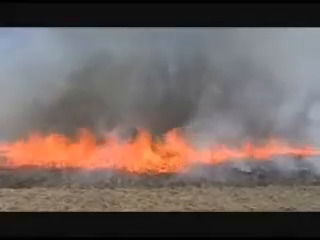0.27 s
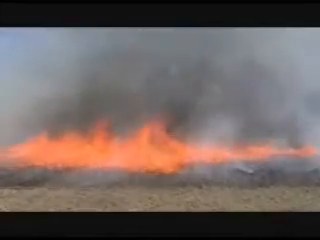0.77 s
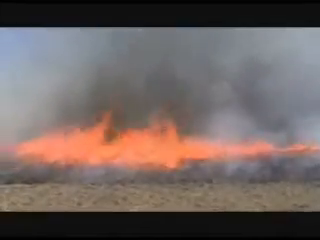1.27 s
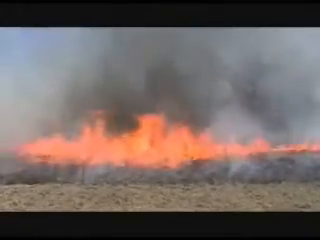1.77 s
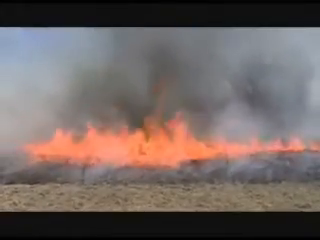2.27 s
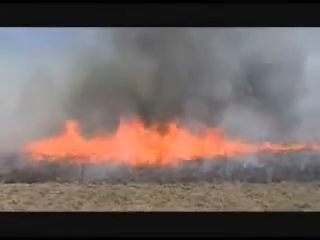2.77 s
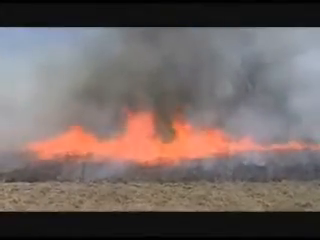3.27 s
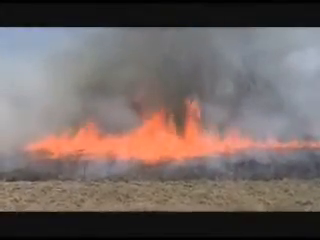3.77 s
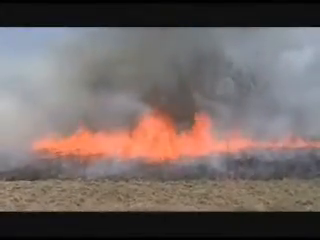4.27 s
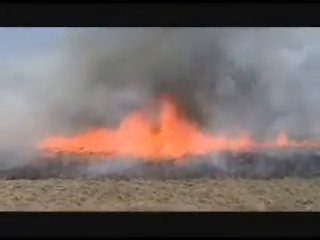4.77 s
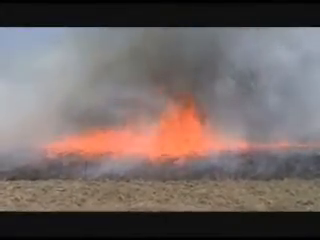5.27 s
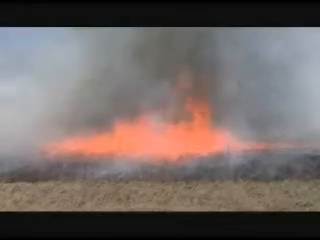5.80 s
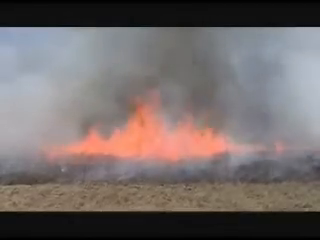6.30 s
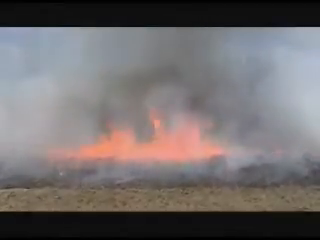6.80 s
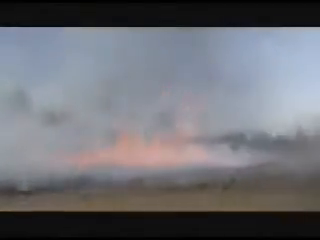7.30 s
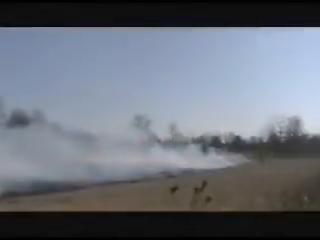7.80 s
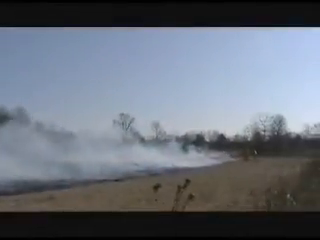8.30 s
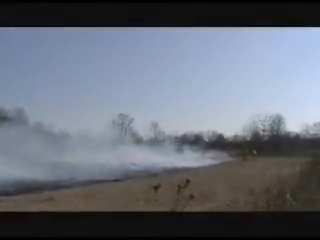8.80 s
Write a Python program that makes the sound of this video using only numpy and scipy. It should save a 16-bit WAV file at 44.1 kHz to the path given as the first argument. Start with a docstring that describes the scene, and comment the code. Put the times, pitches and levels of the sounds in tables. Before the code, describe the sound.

Loud, dry, bright crackling of a grass fire fills the first six seconds, made of countless tiny bursts and volleys of sharp stalk snaps above a soft low roar. The level dips, pops and briefly revives, then drops away by eight seconds. Quiet field rumble and weak smouldering hiss remain, with close twig clicks, short grass rustles and a faint far engine. Outdoors, no room echo, stereo, centre to left.

```python
"""A dense dry crackle on the left and centre: a front of flame runs through dry grass in an open field.
Random bursts splinter and ring in stalks, heard directly and off the ground; noise makes the flames' low roar.
Thick stalks snap in torn noise, and one sealed stem pops with an N-shaped pulse.
The crackle fades and leaves near snaps, bright ticks, grainy rustles, a breeze and a faint far engine hum."""
import sys
import numpy as np
from scipy import signal
from scipy.fft import rfft, irfft
from scipy.io import wavfile
from scipy.ndimage import uniform_filter1d

SR = 44100
rng = np.random.default_rng(int(sys.argv[2]) if len(sys.argv) > 2 else 0)


def generate_wav(sig):
    """Save sig (samples, or channels by samples) to the path in sys.argv[1] as 16-bit PCM at SR."""
    pcm = np.round(np.clip(np.atleast_2d(sig).T, -1, 1) * 32767).astype(np.int16)
    wavfile.write(sys.argv[1], SR, pcm)


N = 399101

# Levels are set at the source, ahead of the ground hollows, the stereo lean and the limiter.
# The crackle starts strong, eases, returns, eases again, revives briefly and fades.
# Each row: time in seconds, crackle level in dB before surges.
BURN = [(0, -14.5), (0.85, -19), (1.35, -16.5), (1.8, -15.5), (2.6, -15.5), (3.8, -15.5), (4.5, -16),
        (5.15, -17), (5.85, -21.5), (6.2, -20), (6.45, -18), (6.9, -18.5), (7.35, -25), (7.55, -28.5),
        (7.8, -31), (8.03, -39), (8.3, -52.5), (9.05, -65)]
# The finest sizzle over time. Each row: time in seconds, level in dB before surges.
SIZZLE = [(0, -37.5), (1.3, -41), (2.1, -35.5), (3.9, -43), (5.1, -44.5), (5.65, -50), (6.3, -45.5),
          (7.3, -53), (7.85, -54), (8.25, -72), (9.05, -77)]
# A tuft catches and the crackle surges. Each row: centre in seconds, rise in dB.
FLARES = [(0.04, 1.5), (0.335, 2.5), (0.57, 2), (0.65, 1), (0.96, 2.5), (1.56, 1.5), (1.77, 2.5),
          (2.125, 2.5), (2.5, 1), (2.9, 1), (3.1, 1.5), (3.31, 1), (3.75, 2), (4.58, 1.5), (6.67, 0),
          (6.78, 1.5), (6.95, 0.7), (7.39, 0.5)]
# The crackle dips briefly. Each row: centre in seconds, fall in dB, width in seconds.
DIPS = [(0.377, 1, .008), (0.452, 3.5, 0.019), (0.7, 2, 0.025), (0.81, 1, 0.021), (1.243, 3, .015),
        (1.62, 2, 0.012), (2.35, 1, 0.017), (2.45, 2, 0.011), (2.69, 1.5, .015), (2.757, 2, 0.012),
        (3.162, 4.5, 0.01), (4.19, 2.5, 0.0091), (4.283, 1.5, .014), (4.41, 2.5, 0.013), (5.76, 0.5, .016),
        (6.03, 2, 0.012), (6.265, 2, .018), (6.6, 1.5, 0.018), (7.12, 1.5, .016), (7.47, 2.5, .016),
        (7.6, 2, 0.014)]
# Shape of the crackle's spectrum. Each row: frequency in Hz, relative level in dB per Hz.
CRACKLE_SPECTRUM = [(40, -64), (320, -21.5), (550, -14.5), (800, -15), (1050, -10.5), (1280, -8),
                    (1570, -6), (1800, -5), (2100, -3), (2500, -1.1), (3500, 2), (4200, -0.5), (5200, -8),
                    (6300, -14), (7400, -23.5), (8200, -21.5), (10000, -26.5), (11000, -42)]
# Width of the crackle. Each row: frequency in Hz, side minus mid in dB.
CRACKLE_WIDTH = [(200, 0), (450, -4), (800, -6), (1300, -8.5), (2000, -10.3), (3000, -12.3), (4000, -8.5),
                 (5000, -6), (6000, -3), (7400, -2), (10000, -3.5)]
# Shape of the flames' roar. Each row: frequency in Hz, relative level in dB per Hz.
ROAR_SPECTRUM = [(25, -13), (45, -32), (70, -2.5), (110, 0.5), (160, 0.5), (230, -2.5), (310, -4),
                 (450, -6), (600, -4.5), (780, -9.5), (1100, -12), (1600, -3), (3000, -19.5), (6000, -73)]
# The low end swells or drops briefly. Each row: centre in seconds, change in dB, width in seconds.
BILLOWS = [(0.37, 3.5, .025), (0.45, -2, .02), (0.6, -11, .014), (0.82, -3, .04), (1.68, -2, .06),
           (2.13, 3, .04), (2.98, 2, .04), (3.3, 2.5, .04), (3.77, 4, .04), (4.2, -3, .03),
           (4.65, 2.5, .04), (5.35, 2, .05), (6.17, 3, .04), (6.47, 3.5, .09), (6.85, 2, .06),
           (7.5, -3, .13)]
# The thickest stalks snapping. Each row: start in seconds, peak in dB before the ground echo,
# pitch in Hz, tearing time in ms.
SNAPS = [(0.1965, -1, 2650, .7), (0.2147, -4, 3600, .7), (0.359, -2, 4120, 1), (0.4119, -3, 2700, .7),
         (0.4202, -2, 3300, .8), (0.556, -2, 3000, .7), (0.667, -5.5, 3200, 1.2), (0.746, -4, 3600, .9),
         (1.1958, -2, 3400, .7), (1.2148, -5, 2800, .8), (1.3348, -3, 3300, .8), (1.5845, -2, 3700, 1),
         (1.772, -1, 3700, .9), (1.8075, -3, 3200, .6), (1.9453, -3, 3200, .5), (2.0108, -4, 3200, .6),
         (2.168, 1.5, 3300, .7), (2.2977, -4, 2900, .7), (2.3673, -5, 4200, .7), (2.4165, -2, 3600, .7),
         (2.482, -3, 3800, 1.8), (2.5104, -1, 2550, .7), (2.6005, -1, 3850, 1), (2.6025, -2.5, 3400, .8),
         (2.6651, -5, 3000, .7), (2.721, -2.5, 3550, 1), (2.7312, -6, 3400, .6), (2.869, -4, 3670, .9),
         (2.9831, -3, 4100, .6), (3.078, -3, 3100, .6), (3.1218, -1, 2800, 1), (3.1422, 0, 2500, .8),
         (3.176, -3, 3500, .9), (3.1949, -5, 3000, .7), (3.238, -4, 2950, .8), (3.2503, -4, 3400, .5),
         (3.297, -2, 3650, 1.2), (3.321, -2, 3300, .8), (3.395, -1, 2700, 1), (3.4397, -1, 3500, .8),
         (3.5604, -3, 3700, .9), (3.845, -2, 2900, .8), (4.0066, -4, 3500, .6), (4.2214, -4, 2700, .7),
         (4.259, -1.5, 3650, 1.1), (4.3095, -5, 3300, .7), (4.7273, 0, 3450, .7), (4.927, -4, 3800, .4),
         (4.9922, -2, 3100, .4), (5.8677, -8, 2800, .6), (6.2404, 2, 3850, .7), (6.2429, -3.5, 3750, .8),
         (6.402, -5, 3100, .5), (6.6637, -5, 3000, .9), (7.3453, -12.5, 3400, .8), (7.3947, -13.5, 3100, 1),
         (7.506, -17, 3300, .7), (7.7694, -16, 3200, .9), (7.944, -23, 2800, .7), (8.0695, -22, 3200, .8)]
# Colour of a snap. Each row: frequency in Hz, filter gain in dB.
SNAP_COLOUR = [(200, -32), (1000, 3), (2200, 7), (3800, 11.5), (5500, 2.5), (7500, -13), (11000, -18)]
# A sealed stem bursts. One row: start in seconds, pulse peak in dB before its filters, length in seconds.
POP = (6.0133, -4, 0.00142)
# Bright clicks: the first sharpens the stalk snap at 6.24 s, the rest are dry twigs close by.
# Each row: start in seconds, peak in dB, pitch in Hz.
TICKS = [(6.2414, -8, 4200), (8.0693, -22, 2700), (8.0712, -17, 3600), (8.3248, -33, 8500),
         (8.3275, -35, 7000), (8.4462, -23, 3900), (8.4765, -37, 7500), (8.6222, -33, 2300),
         (8.6500, -39, 7500), (8.6623, -29, 7500), (8.7188, -31, 1900), (8.7605, -35, 5500),
         (8.7660, -36, 6000), (8.8182, -37, 3700), (8.8262, -32, 8500), (8.8490, -33, 4000),
         (8.8619, -31, 7000), (8.8662, -32, 4200), (8.8793, -20.5, 4000)]
# Colour of a tick. Each row: frequency in Hz, filter gain in dB.
TICK_COLOUR = [(300, -19), (1200, -3), (3500, 0.5), (5500, -9), (8000, -5.5), (11000, -14)]
# Short rustles of dry grass. Each row: start in seconds, level at the top of the swell in dB,
# pitch in Hz, swell time in ms.
RUSTLES = [(8.070, -38, 3000, 3.5), (8.242, -40, 2000, 3), (8.323, -43, 6000, 3), (8.468, -46, 5000, 7),
           (8.620, -41.5, 2400, 3), (8.630, -45, 3000, 2.5), (8.758, -45.5, 5500, 4),
           (8.864, -44, 4300, 1.8), (8.922, -42, 3100, 2.5), (9.016, -41, 3200, 3.5)]
# Colour of a rustle. Each row: frequency in Hz, filter gain in dB.
RUSTLE_COLOUR = [(500, -11), (2500, 3), (4500, -2), (8000, -9), (11000, -20)]
# A gust buffets the microphone. Each row: centre in seconds, level at its height in dB.
GUSTS = [(0.42, -51), (2.07, -45), (2.61, -44), (3.34, -48), (4.03, -48), (4.32, -55), (4.73, -55),
         (6.02, -51), (6.35, -53), (6.62, -55.5), (7.54, -59)]
# Shape of wind on the microphone. Each row: frequency in Hz, relative level in dB per Hz.
WIND_SPECTRUM = [(12, -8), (25, -11), (42, 0), (60, -2), (110, -25), (300, -60)]
# Shape of the field's rumble. Each row: frequency in Hz, relative level in dB per Hz.
FIELD_SPECTRUM = [(25, -42), (45, -22), (70, 4.5), (130, 1.5), (310, -1.5), (450, 0.5), (870, -4.5),
                  (1210, -7), (2950, -14), (5000, -43)]
# Shape of the hiss of smouldering stubble. Each row: frequency in Hz, relative level in dB per Hz.
SMOULDER_SPECTRUM = [(500, -10), (1500, -7), (3200, 2), (5000, -4.5), (7500, -7.5), (11000, -26)]
# Tones of the far engine. Each row: centre frequency in Hz, middle level in dB.
ENGINE_TONES = [(63, -60.5), (125.8, -59.5), (150, -57), (252, -63)]
# Overtones of a thin whine. Each row: multiple of the fundamental, level in dB.
WHINE_OVERTONES = [(5, -70), (12, -67), (14, -68), (20, -67), (22, -68)]
# Narrow bands that the ground cancels. Each row: centre in Hz before it wanders, width in Hz,
# share taken out at full depth.
HOLLOWS = [(308.4, 82, 0.91), (818, 42, 0.34), (1290, 90, .4)]
# The hollows come and go, and fill as the front moves on. Each row: time in seconds, depth from 0 to 1.
HOLLOW_DEPTH = [(0, 1), (0.42, .97), (0.65, .55), (0.9, 1), (1.27, 0.97), (1.5, 0.6), (2.15, .55),
                (2.5, .95), (2.85, 0.6), (3.3, 0.9), (3.8, 0.16), (4.12, .75), (4.5, 0.24), (7, 0.33),
                (8, 0)]
# The sound's lean across the microphone. Each row: frequency in Hz, left minus right in dB.
LEAN = [(100, 5.5), (450, 5.5), (780, 7), (1400, 4), (3500, 1.5), (6000, 0.7), (7400, -2.5), (8700, 3)]
# The sound narrows briefly. Each row: centre in seconds, pull (1 or more is fully central), width in seconds.
NARROWINGS = [(0.07, 1.1, 0.043), (0.96, 1.27, 0.037), (1.335, 1.28, 0.052), (1.8, 1.12, 0.056),
              (2.11, 0.95, 0.047), (2.53, 1.15, 0.059), (3.09, .8, .028), (3.31, 1.24, 0.033),
              (3.775, 1.3, 0.028), (3.99, .9, 0.042), (4.58, 1.03, 0.045), (6.03, 0.78, .016),
              (6.37, 1.25, 0.077), (7.82, .55, 0.086)]

# the crackle: nominal rate over all patches; its body of big stalks relative to the rest
BURSTS_PER_S, BODY_DB, FLARE_WIDTH_S = 9000, -12.5, 0.034
# multiplies the crackle's surges in dB: the sizzle swings harder
SIZZLE_FOLLOWS = 1.66
# roar level at full burn, and the share of the crackle's swing that it follows
FULL_BURN_DB, ROAR_DB, ROAR_FOLLOWS = -16.5, -35, 0.43
# left-right likeness of the roar, first and last
ROAR_ALIKE_FIRST, ROAR_ALIKE_LAST = 0.77, 0.55
BILLOW_TOP_HZ = 800
# lesser chance snaps: rate at full burn, peak above the crackle, range of pitch, tearing time
SNAPS_PER_S, SNAP_OVER_DB, SNAP_LOW_HZ, SNAP_HIGH_HZ, SNAP_TEAR_MS = 24, 3.5, 2030, 4430, 0.47
# lesser chance ticks in the stubble: rate, middle peak
TICKS_PER_S, TICK_DB = 26, -44.5
# path off the ground: nominal delay, echo gain, echo low-pass, spread of delay among patches (share)
GROUND_DELAY_S, GROUND_REFLECTION, GROUND_CUT_HZ, GROUND_SPREAD = 0.00178, 0.3, 1750, 0.051
# hot air bends that path: share by which its delay and the hollows wander
GROUND_WANDER, HOLLOW_WANDER = 0.052, 0.035
GUST_WIDTH_S, BREEZE_DB, FIELD_DB, SMOULDER_DB = .05, -69, -45.5, -51.5
WHINE_HZ = 149.8
CUTOFF_HZ = 11300


def crackle(burn_db, sizzle_db, left_lead_s=.000008, flare_db=1.0, haze_db=-15):
    """Patches along the front flare together, while each wanders quickly from side to side."""
    mid, side = np.zeros(N), np.zeros(N)
    flare = from_db(flare_db * drift(35))
    shimmer = GROUND_WANDER * drift(3.7)
    for k, stalk_hz in enumerate(np.geomspace(1400, 6500, num=12)):
        bursts = patch(stalk_hz, flare)
        mid += off_ground(bursts, GROUND_SPREAD * np.sin(2 * k) + shimmer)
        side += bursts * np.tanh(2 * drift(115))
    # the farthest bursts blur into hiss
    far = from_db(haze_db) * rng.standard_normal((2, N))
    mid = rms_one(mid) + far[0]
    side = colour(rms_one(side) + far[1], CRACKLE_WIDTH)[0]
    left, right = mid + side, delay(mid - side, left_lead_s)
    sound = colour(np.array([left, right]), CRACKLE_SPECTRUM)
    # big stalks give the body, fine blades the sizzle
    body, above = split(sound, 1472)
    crack, sizzle = split(above, 7110)
    main = from_db(BODY_DB) * rms_one(body) + rms_one(crack)
    return from_db(burn_db) * main + from_db(sizzle_db) * rms_one(sizzle)


def patch(stalk_hz, flare, size_db=2.5, flicker_db=1.5, ring=1.87, stalk_width_hz=1100,
          splinter=0.86, splinter_s=0.0025):
    """Clumps of bursts, mostly tiny, that splinter and ring briefly in stalks of one size."""
    chance = BURSTS_PER_S / 12 / SR * flare * from_db(2 * flicker_db * drift(25))
    born = np.flatnonzero(rng.random(N) < chance)
    sizes = from_db(size_db * np.minimum(rng.exponential(1, len(born)), 5.0))
    clicks = np.zeros(N)
    clicks[born] = sizes * rng.choice([-1, 1], len(born))
    # torn fibres go on giving way just after each burst
    keep = np.exp(-1 / (splinter_s * SR))
    tearing = np.sqrt(signal.lfilter([1 - keep], [1, -keep], clicks ** 2 + 1e-18))
    force = clicks + splinter * tearing * rng.standard_normal(N)
    return force + ring * resonate(force, stalk_hz, stalk_width_hz)


def surge(unrest_db=0.64):
    """Quick changes of crackle level in dB: surges, brief dips and a restless flicker."""
    flares = swells([(s, rise_db, FLARE_WIDTH_S) for s, rise_db in FLARES])
    return flares - swells(DIPS) + unrest_db * drift(13)


def roar(burn_db, billow_db=2.0):
    """Flame noise that billows and roars with the burn, and slowly spreads wider."""
    level_db = ROAR_DB + ROAR_FOLLOWS * (burn_db - FULL_BURN_DB) + billow_db * drift(11.6)
    return from_db(level_db) * air(ROAR_SPECTRUM, np.linspace(ROAR_ALIKE_FIRST, ROAR_ALIKE_LAST, N))


def snaps(burn_db, ring=9.3, width_hz=1300, give_s=.0005):
    """Thick stalks give way in quick volleys of tearing fibres; the harder the burn, the more of them."""
    out, t = np.zeros(N), np.arange(SR // 50) / SR
    chance = SNAPS_PER_S / SR * from_db((burn_db - FULL_BURN_DB) / 2)
    born = np.flatnonzero(rng.random(N) < chance)
    lesser = [(i / SR, burn_db[i] + SNAP_OVER_DB, rng.uniform(SNAP_LOW_HZ, SNAP_HIGH_HZ), SNAP_TEAR_MS)
              for i in born]
    for s, peak_db, hz, tear_ms in list(SNAPS) + lesser:
        force = rng.standard_normal(len(t)) * t * np.exp(-1000 * t / tear_ms)
        snap = colour(force + ring * resonate(force, hz, width_hz), SNAP_COLOUR)[0, :len(t)]
        add(out, s + give_s, from_db(peak_db) * snap / np.abs(snap).max())
    return off_ground(out)


def pop(low_hz=260, top_hz=3400, split_db=0, split_hz=2200, split_width_hz=1100):
    """Escaping steam sends out one N-shaped pressure pulse, and the stem splits with a click."""
    s, peak_db, length_s = POP
    phase = (np.arange(N) / SR - s) / length_s
    pulse = (1 - 2 * phase) * ((phase >= 0) & (phase < 1))
    pulse = cut(cut(pulse, low_hz, "high", order=1), top_hz, "low")
    impulse = 1. * (np.arange(N) == int((s + length_s) * SR))
    click = cut(resonate(impulse, split_hz, split_width_hz), top_hz, "low")
    return from_db(peak_db) * pulse + from_db(split_db) * click / np.abs(click).max()


def ticks(ring=2.2, width_hz=2200, splinter=0.072, splinter_s=0.0026):
    """Bright clicks, nearly all of dry twigs or stubble, each a ringing impulse with a faint splintering."""
    out, t = np.zeros(N), np.arange(SR // 50) / SR
    born = np.flatnonzero(rng.random(N) < TICKS_PER_S / SR)
    lesser = [(i / SR, TICK_DB + rng.normal(0, 2.5), rng.uniform(2000, 7000)) for i in born]
    for s, peak_db, hz in list(TICKS) + lesser:
        force = (t == 0) + splinter * rng.standard_normal(len(t)) * np.exp(-t / splinter_s)
        tick = colour(force + ring * resonate(force, hz, width_hz), TICK_COLOUR)[0, :len(t)]
        add(out, s, from_db(peak_db) * tick / np.abs(tick).max())
    return out


def rustles(ring=2.3, width_hz=2400, grain_db=3):
    """Dry blades brush together in short grainy puffs, each with a pitch of its own."""
    out, t = np.zeros(N), np.arange(SR // 10) / SR
    brushing = rng.standard_normal(N) * from_db(grain_db * drift(400))
    for s, level_db, hz, swell_ms in RUSTLES:
        force = np.roll(brushing, -int(s * SR))[:len(t)]
        age = 1000 * t / swell_ms
        puff = rms_one(colour(force + ring * resonate(force, hz, width_hz), RUSTLE_COLOUR)[0, :len(t)])
        add(out, s, from_db(level_db) * age * np.exp(1 - age) * puff)
    return out


def outdoors():
    """Wind, the wide rumble of the field, central smouldering hiss, the far engine and a thin whine."""
    field = from_db(FIELD_DB) * air(FIELD_SPECTRUM, alike=0.2)
    smoulder = from_db(SMOULDER_DB) * air(SMOULDER_SPECTRUM, alike=1.0)
    return wind() + field + smoulder + engine() + whine()


def wind():
    """Low noise of a light breeze on the microphone, with short gusts."""
    gusts = swells([(s, from_db(level_db), GUST_WIDTH_S) for s, level_db in GUSTS])
    return (from_db(BREEZE_DB) + gusts) * air(WIND_SPECTRUM, alike=.6)


def engine(waver_hz=0.55, swell_db=3):
    """Low engine tones, wavering in pitch and level on their way across the field."""
    out = np.zeros(N)
    for hz, db in ENGINE_TONES:
        level = from_db(db + swell_db * drift(3.3))
        phase = 2 * np.pi * np.cumsum(hz + waver_hz * drift(2.8)) / SR
        out += level * np.sqrt(2) * np.sin(phase)
    return out


def whine():
    """A few faint steady sine overtones of one pitch."""
    phase = 2 * np.pi * WHINE_HZ * np.arange(N) / SR
    return sum(from_db(db) * np.sqrt(2) * np.sin(multiple * phase) for multiple, db in WHINE_OVERTONES)


def off_ground(x, stretch=0):
    """The ground returns a dull echo, sooner or later as its path stretches."""
    echo = delay(x, GROUND_DELAY_S * (1 + stretch))
    return x + GROUND_REFLECTION * cut(echo, GROUND_CUT_HZ, "low")


def hollow(x):
    """Take out the wavering bands that the ground cancels."""
    depth, = in_time(HOLLOW_DEPTH)
    bend = 1 + HOLLOW_WANDER * drift(5.5)
    for hz, width_hz, share in HOLLOWS:
        # turn the band down to 0 Hz, low-pass it and turn it back
        turn = np.exp(2j * np.pi * np.cumsum(hz * bend) / SR)
        band, _ = split(x / turn, width_hz / 2)
        x = x - np.clip(share * depth, 0, 1) * 2 * np.real(turn * band)
    return x


def billowing(x):
    """The low end swells and sinks under the crackle."""
    low, high = split(x, BILLOW_TOP_HZ)
    return high + low * from_db(swells(BILLOWS))


def narrowing(x):
    """The sound draws in towards the centre for a moment and spreads out again."""
    mid, side = (x[0] + x[1]) / 2, (x[0] - x[1]) / 2
    closed = np.clip(swells(NARROWINGS), 0, 1)
    return mid + side * (1 - closed) * [[1], [-1]]


def air(spectrum, alike):
    """Stereo noise of unit power whose channels are partly alike."""
    mid, side = rng.standard_normal((2, N))
    alike = np.clip(alike, 0, 1)
    stereo = np.sqrt(1 + alike) * mid + np.sqrt(1 - alike) * side * [[1], [-1]]
    return rms_one(colour(stereo, spectrum))


def swells(rows):
    """Sum of bell-shaped swells, each with its centre (s), height and width (s)."""
    t = np.arange(N) / SR
    return sum(height * np.exp(-.5 * ((t - s) / width_s) ** 2) for s, height, width_s in rows)


def drift(rate_hz):
    """Slow random wander of spread 1, from noise through two equal low-passes."""
    # drawn at every 40th sample, after a run-in of 2000 draws
    r = np.exp(-80 * np.pi * rate_hz / SR)
    slow = signal.lfilter([1], [1, -2 * r, r * r], rng.standard_normal(N // 40 + 2002))[2000:]
    return np.interp(np.arange(N) / 40, np.arange(len(slow)), rms_one(slow))


def in_time(rows):
    """Each column of a curve at every sample."""
    s, *columns = np.transpose(rows)
    return [np.interp(np.arange(N) / SR, s, c) for c in columns]


def from_db(db):
    """Decibels to gain."""
    return 10 ** (np.asarray(db) / 20)


def rms_one(x):
    """Scale to unit power."""
    return x / np.sqrt(np.mean(x ** 2) + 1e-20)


def cut(x, hz, kind, order=2):
    """Butterworth filter."""
    return signal.sosfilt(signal.butter(order, hz, kind, fs=SR, output="sos"), x + 1e-18)


def split(x, hz):
    """Lows and highs that add up to the whole."""
    sos = signal.butter(4, hz, "low", fs=SR, output="sos")
    low = signal.sosfiltfilt(sos, x, padtype="even", padlen=SR // 10)
    return low, x - low


def colour(x, spectrum, share=1):
    """Causal (minimum-phase) filter with the given spectrum, its decibels scaled by share."""
    size = 4096
    hz, db = np.transpose(spectrum)
    bins_hz = np.arange(size // 2 + 1) * SR / size
    log_gain = np.log(from_db(share * np.interp(np.log(bins_hz + 1), np.log(hz), db)))
    # folding the cepstrum forward in time gives minimum phase
    cepstrum = irfft(log_gain)[:size // 2]
    cepstrum[1:] *= 2
    response = irfft(np.exp(rfft(cepstrum, size)))[:size // 2]
    return signal.oaconvolve(np.atleast_2d(x), response[None], axes=1)[:, :N]


def resonate(x, hz, width_hz):
    """One two-pole resonance, gain about 1 on top."""
    r = np.exp(-np.pi * width_hz / SR)
    zeros = np.array([1, 0, -1]) * (1 - r * r) / 2
    poles = [1, -2 * r * np.cos(2 * np.pi * hz / SR), r * r]
    return signal.lfilter(zeros, poles, x + 1e-18)


def delay(x, s):
    """The same sound s seconds later."""
    return np.interp(np.arange(N) - s * SR, np.arange(N), x, left=0)


def add(out, s, sound):
    """Mix a short sound in at time s."""
    at = int(s * SR)
    out[at:at + len(sound)] += sound[:max(N - at, 0)]


def scene(sway_db=0.46):
    """Crackle, roar and near events over the open field, leaning left except in a band around 7 kHz."""
    course_db, = in_time(BURN)
    sizzle_db, = in_time(SIZZLE)
    surge_db = surge()
    burn_db = course_db + surge_db
    # the strongest flames shift from side to side
    sway = from_db(sway_db * drift(2.2) * [[1], [-1]])
    fire = crackle(burn_db, sizzle_db + SIZZLE_FOLLOWS * surge_db) * sway
    field = billowing(fire + roar(burn_db) + outdoors())
    sound = hollow(field + snaps(burn_db)) + ticks() + rustles() + pop()
    left, right = colour(sound[0], LEAN, share=.5), colour(sound[1], LEAN, share=-.5)
    return narrowing(np.vstack([left, right]))


def record(dry, ceiling_db=-.5, recovery_db_per_s=90, low_cut_hz=33):
    """The microphone drops deep rumble; a limiter ducks at the loudest cracks and recovers; the top is cut."""
    heard = cut(dry, low_cut_hz, "high", order=4)
    over_db = np.maximum(20 * np.log10(np.abs(heard).max(axis=0) + 1e-9) - ceiling_db, 0)
    # each duck recovers in a straight line of dB
    ramp = recovery_db_per_s * np.arange(N) / SR
    duck_db = np.maximum.accumulate(over_db + ramp) - ramp
    limited = np.clip(heard * from_db(-uniform_filter1d(duck_db, size=32)), -1, 1)
    return signal.sosfilt(signal.ellip(10, .2, 70, CUTOFF_HZ, fs=SR, output="sos"), limited)


dry = scene()
out = record(dry)
generate_wav(out)
```